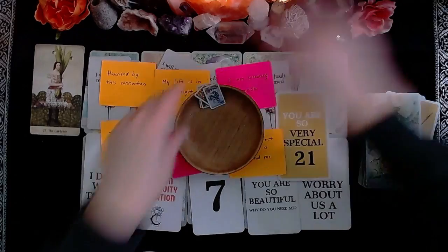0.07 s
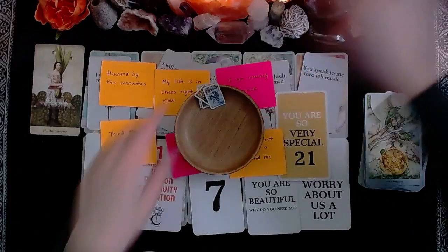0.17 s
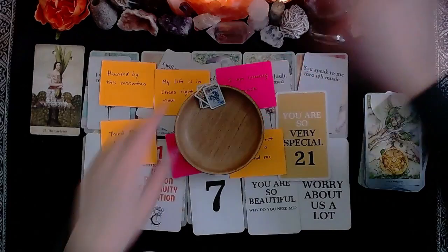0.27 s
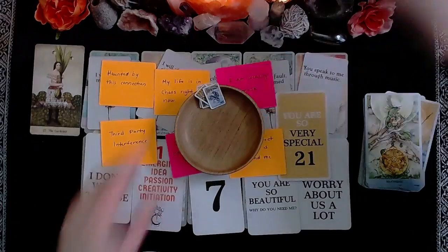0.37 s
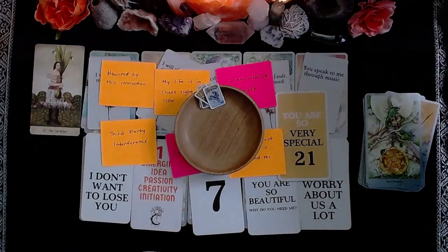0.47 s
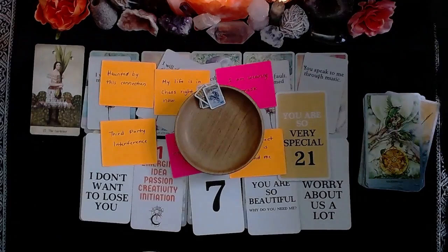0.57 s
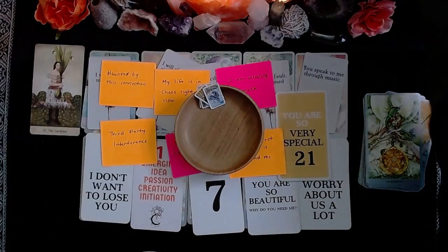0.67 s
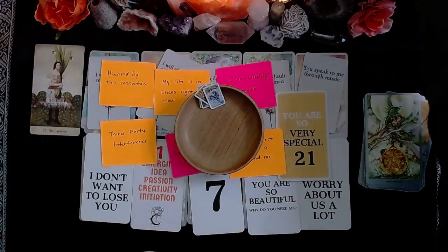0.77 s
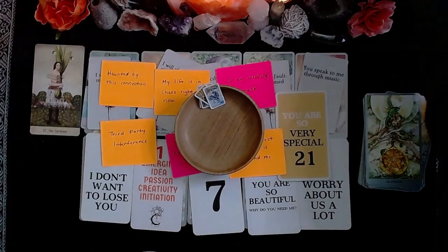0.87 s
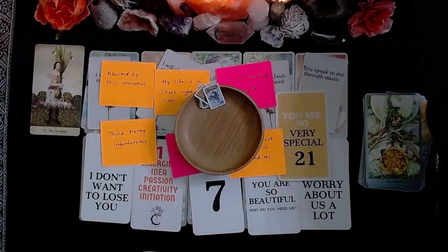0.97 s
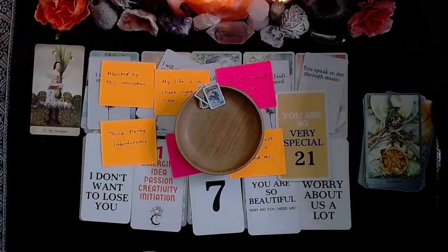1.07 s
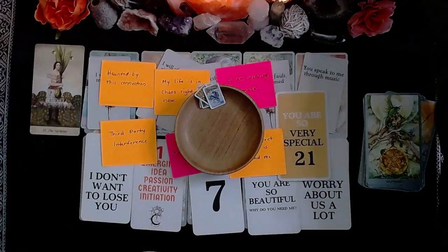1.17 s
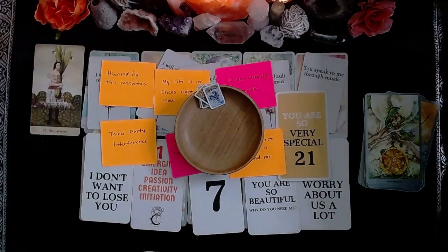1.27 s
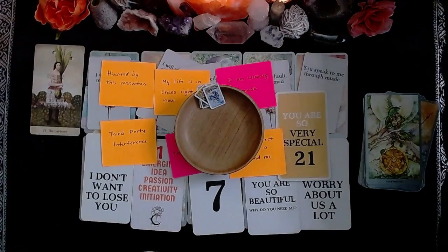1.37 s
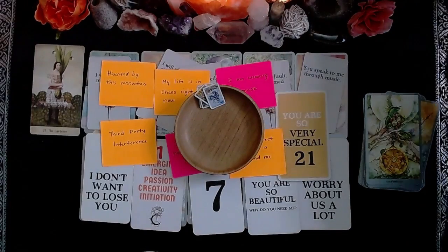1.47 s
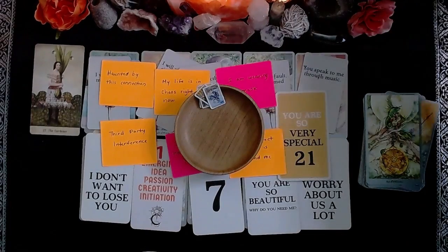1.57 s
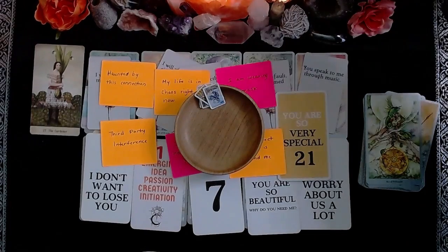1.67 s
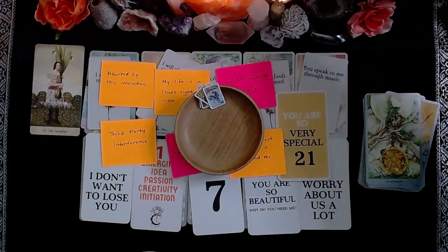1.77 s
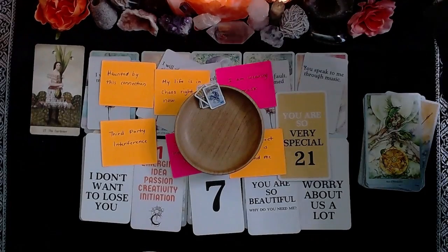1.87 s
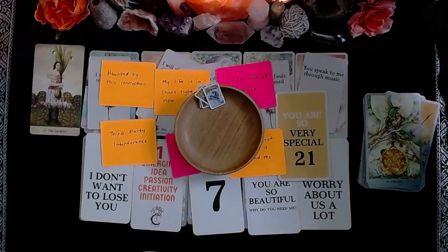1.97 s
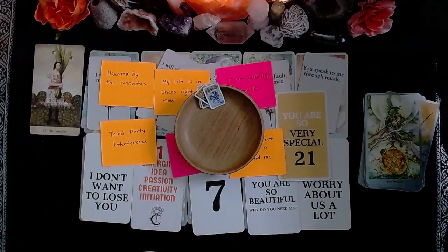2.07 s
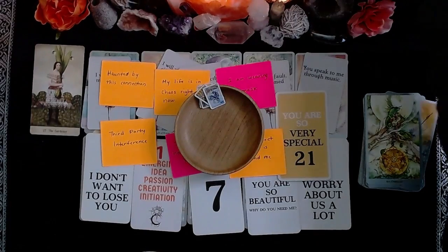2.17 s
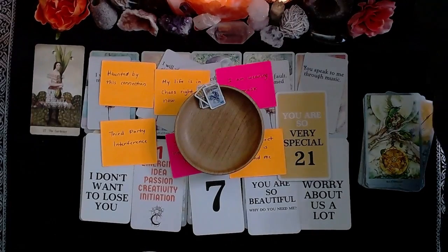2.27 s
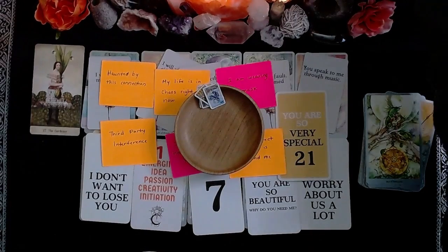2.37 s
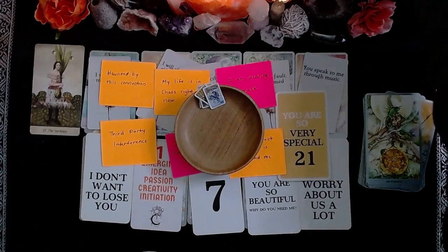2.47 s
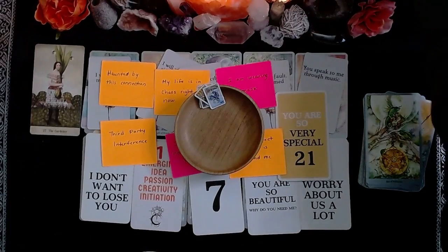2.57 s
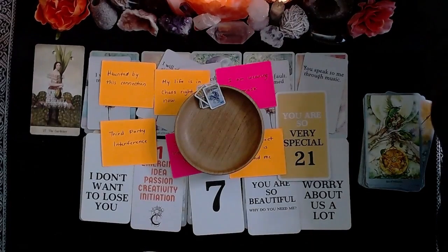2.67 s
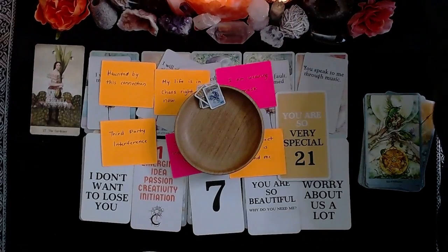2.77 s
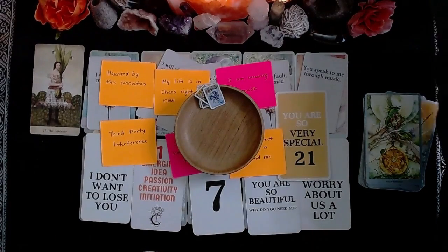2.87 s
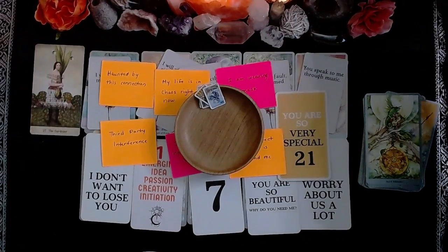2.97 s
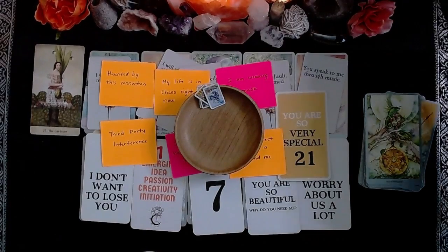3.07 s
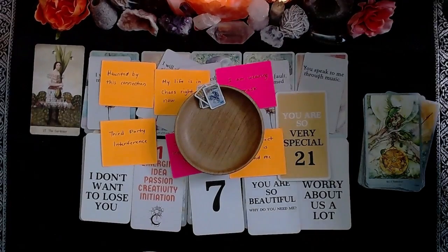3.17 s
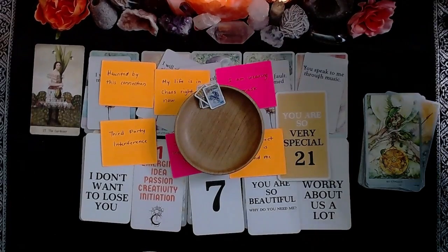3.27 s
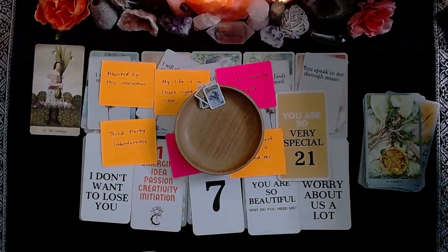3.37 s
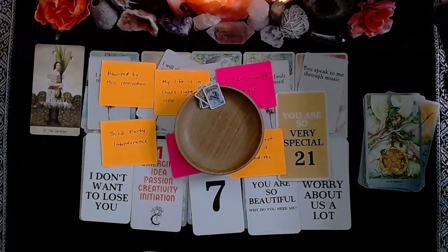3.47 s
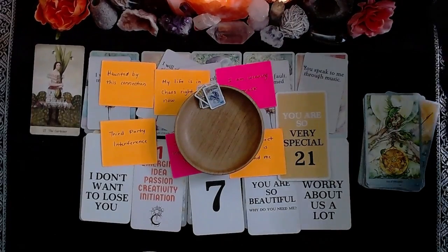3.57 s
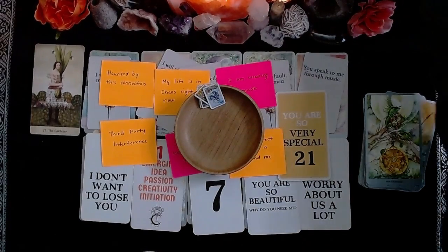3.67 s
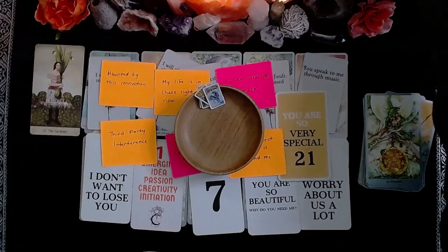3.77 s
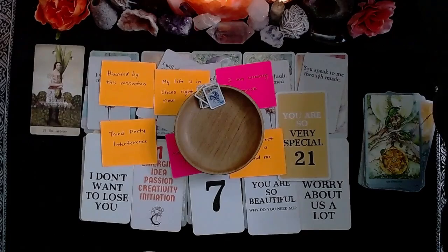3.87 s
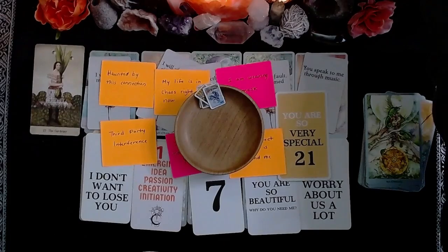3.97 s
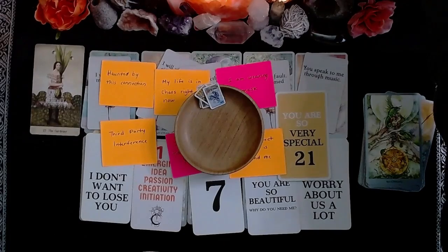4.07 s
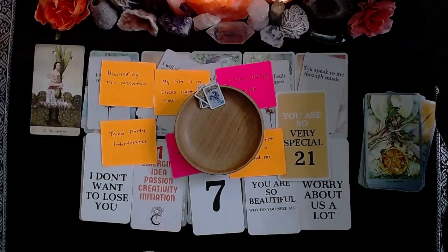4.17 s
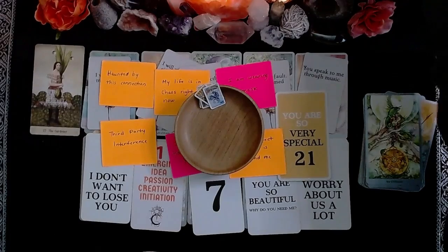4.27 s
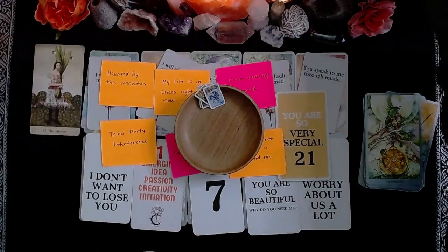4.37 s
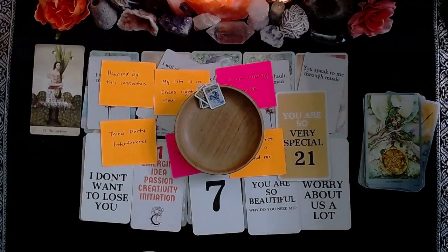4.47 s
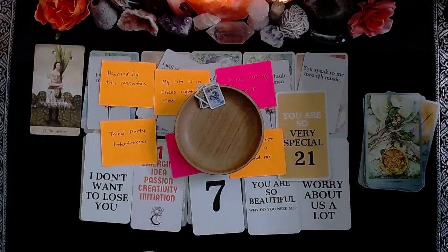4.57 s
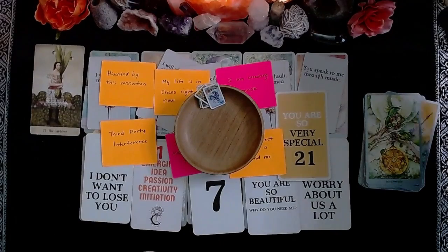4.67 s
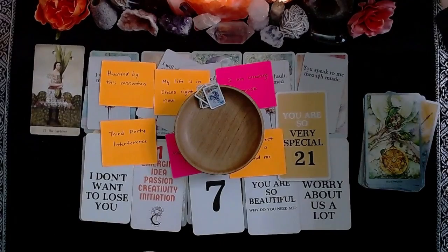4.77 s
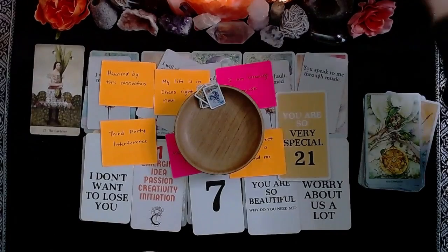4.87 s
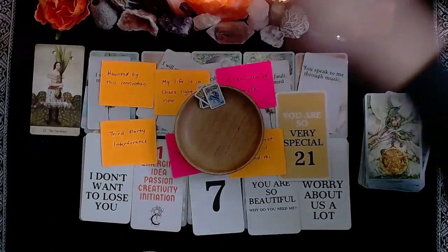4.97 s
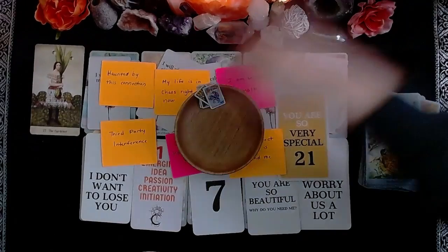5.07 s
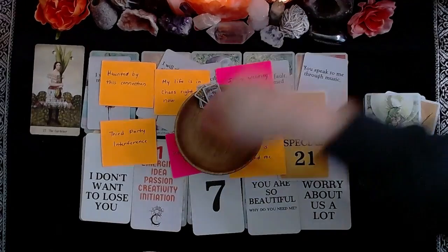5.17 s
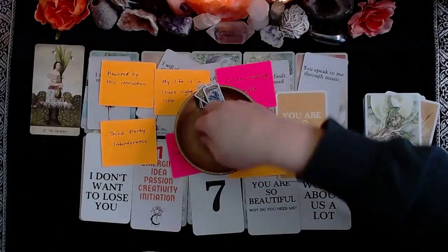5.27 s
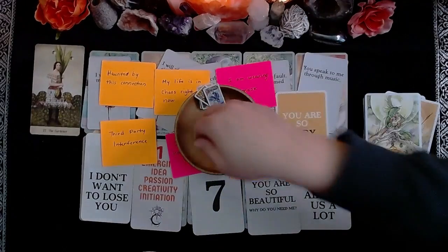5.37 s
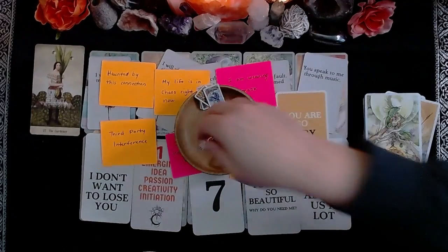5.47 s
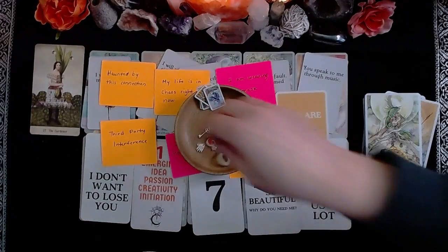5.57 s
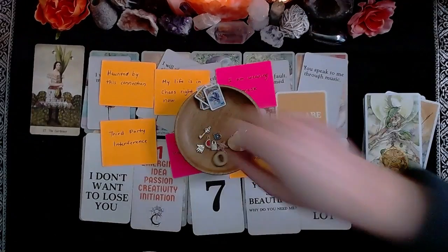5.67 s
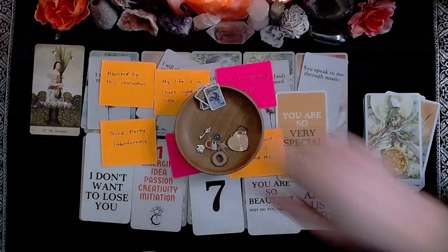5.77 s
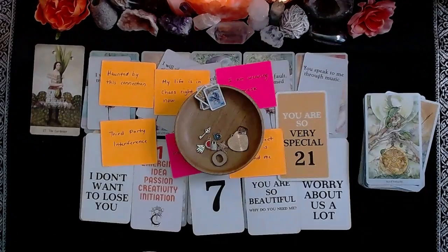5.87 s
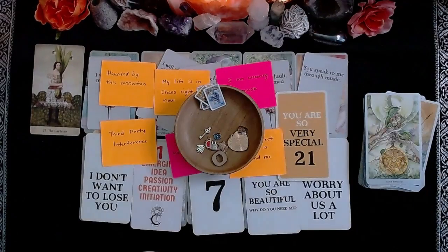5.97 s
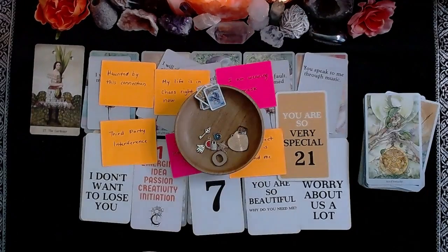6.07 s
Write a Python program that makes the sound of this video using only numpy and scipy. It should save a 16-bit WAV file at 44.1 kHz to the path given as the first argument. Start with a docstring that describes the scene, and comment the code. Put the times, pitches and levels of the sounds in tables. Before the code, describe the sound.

In a quiet room with low hiss and faint hum, a hand rummages through a box of small metal charms for over four seconds, making dense bright clatter, sharp clinks and dull table bumps. After a brief lull with light ticks in the closed hand, the charms drop into a wooden bowl with woody knocks and chinks that quickly settle. Close stereo microphone, short room reflections, slightly dulled top treble.

```python
"""A quiet room with hiss and mains hum runs throughout; soon a hand stirs a boxful of small metal charms.
Dense random collisions ring the charms and the box and shake the table, with single clinks and brief swells of ringing.
Then the charms tick in the closed hand on the way over: brief rattles and notes over a faint rustle.
At last they drop into a wooden bowl in front: knocks, rim rings and chinks thin out as small slides settle.
"""
import sys
import numpy as np
from scipy import signal
from scipy.fft import rfft, irfft, next_fast_len
from scipy.io import wavfile

SR = 44100
rng = np.random.default_rng(int(sys.argv[2]) if len(sys.argv) > 2 else 0)


def transcribe(u):
    """Save the signal u as a 16-bit wav file named by the first command-line argument.

    u: samples, shape (n,) or (channels, n), limited to [-1, 1]; the rate is SR.
    q: integer samples, one column per channel.
    """
    v = np.clip(np.atleast_2d(u).T, -1, 1)
    q = np.round(v * 32767).astype(np.int16)
    wavfile.write(sys.argv[1], SR, q)


N = 270244


def amp(db):
    """Decibels to linear gain."""
    return 10 ** (np.asarray(db) / 20)


def unit(x):
    """x scaled to an rms of one."""
    return x / np.sqrt(np.mean(x ** 2) + 1e-20)


def along(points, hz):
    """Read (pitch_hz, value) points at any frequency, on a log axis."""
    point_hz, value = np.transpose(points)
    return np.interp(np.log(hz + 1), np.log(point_hz + 1), value)


def curves(rows):
    """One level per sample for each column after the time, silent outside the rows."""
    s, *columns = np.transpose(rows)
    t = np.arange(N) / SR
    return [np.interp(t, s, column, left=-120, right=-120) for column in columns]


def fading(s, db, t60):
    """A gain that rises over 8 ms at s and dies away by 60 dB in t60 seconds."""
    t = np.arange(N) / SR - s
    return np.clip(t / .008, 0, 1) * amp(db - 60 * np.maximum(t, 0) / t60)


def wobble(rate):
    """A slow random curve with the given number of knots a second."""
    knots = rng.standard_normal(int(N * rate / SR) + 2)
    return np.interp(np.arange(N) * rate / SR, np.arange(len(knots)), knots)


def filtered(x, response):
    """x times a complex response of frequency."""
    m = next_fast_len(N + SR // 2)
    spectrum = rfft(x, m) * response(np.fft.rfftfreq(m, 1 / SR))
    return irfft(spectrum, m)[..., :N]


def ring(x, modes, shift_db=0):
    """x through a body's resonances; shift_db lets each one be driven harder or softer for a while."""
    out = np.zeros(len(x))
    for k, (hz, width, db) in enumerate(modes):
        drive = x * amp(shift_db * wobble(14)) if shift_db else x
        resonance = signal.lfilter(*signal.iirpeak(hz, hz / width, SR), drive)
        out += (-1) ** k * amp(db) * resonance
    return out


def collisions(per_s, spread_db, clump_db):
    """Random impacts: many small, few large, coming in clumps and short bursts."""
    chance, size, sign = rng.random((3, N))
    force = amp(-abs(spread_db) * np.log(size + .02)) * np.sign(sign - .5)
    train = (chance < per_s / SR) * force
    return unit(train * amp(clump_db * wobble(45) + 2.38 * wobble(160)))


def blows(times, db, modes, t60, rise_s=1e-5):
    """Single impacts: each a short rattle of contacts through the body, db the peak of its ring."""
    t = np.arange(SR // 20) / SR
    force = np.zeros(N + SR)
    envelope = amp(-60 * t / t60) * (1 - np.exp(-(t + 1 / SR) / rise_s))
    rattles = envelope * rng.standard_normal((len(times), len(t)))
    for s, level, rattle in zip(times, db, rattles):
        peak = np.abs(ring(rattle, modes)).max()
        force[round(s * SR):][:len(t)] += amp(level) * rattle / peak
    return ring(force[:N], modes)


def notes(times, db, hz, t60):
    """A struck charm rings briefly on its own note: a decaying sine with a soft onset."""
    t = np.arange(SR // 6) / SR
    out = np.zeros(N + SR)
    onset = 1 - np.exp(-t / 0.0003)
    for s, level, pitch in zip(times, db, hz):
        out[round(s * SR):][:len(t)] += amp(level - 60 * t / t60) * np.sin(2 * np.pi * pitch * t) * onset
    return out[:N]


# colour of the hiss, relative: pitch_hz, level_db
HISS_COLOUR = [(15, -19.5), (30, -3), (65, -6.5), (90, -25.5), (125, -5), (160, -19.5), (280, -21),
               (500, -25.5), (1480, -29.5), (3000, -41), (6770, -46), (8870, -44)]
# mains hum, rms level before it wavers: pitch_hz, level_db
HUM_TONES = [(60, -63), (120, -49.5), (181, -65), (242, -63.5), (298, -67)]
HISS_DB = -50


def room_tone():
    """Air and electronics hiss, mostly alike at both ports, with slightly unsteady hum."""
    mid, side = filtered(rng.standard_normal((2, N)), lambda hz: amp(along(HISS_COLOUR, hz)))
    hiss = amp(HISS_DB) * unit(np.array([mid + 0.43 * side, mid - 0.48 * side]))
    t = np.arange(N) / SR
    hum = np.zeros(N)
    for hz, db in HUM_TONES:
        level = np.sqrt(2) * amp(db + 3.1 * wobble(9))
        hum += level * np.sin(2 * np.pi * hz * t + 0.3 * wobble(8))
    return hiss + hum


# the room's answer: pitch_hz, t60_s, level_db
WALL_ANSWER = [(30, .2, -11), (70, 0.17, -3.5), (200, .2, -13), (495, 0.35, -12), (1000, .15, -5.5),
               (1990, 0.091, -1.5), (5130, .08, -2), (5970, .07, -5), (8500, 0.044, -4.5)]


def walls(x):
    """Each frequency dies at its own speed; the pieces move, so overlapping slices take new paths to each port."""
    hop = SR // 8  # slices last two hops, a quarter second
    blocks = N // hop + 2
    hz, t, noise = signal.stft(rng.standard_normal((blocks, 2, SR // 4)), SR, nperseg=256)
    at_hz, t60, db = np.transpose(WALL_ANSWER)
    t60, db = (np.interp(np.log(hz + 1), np.log(at_hz), c)[:, None] for c in (t60, db))
    decay = amp(-60 * t / t60)
    decay /= np.linalg.norm(decay, axis=1, keepdims=True)
    tails = signal.istft(noise * amp(db) * decay, SR, nperseg=256)[1] / np.sqrt(128)
    x = np.pad(x, (hop + 120, 3 * hop))  # 120 samples of delay before the answer
    out = np.zeros((2, N + 2 * SR))
    fade = np.sin(np.pi * np.arange(2 * hop) / (2 * hop))
    for k, tail in enumerate(tails):
        piece = x[k * hop:][:2 * hop] * fade
        wet = signal.fftconvolve(piece[None], tail, axes=1)
        out[:, k * hop:][:, :wet.shape[1]] += wet
    return out[:, hop:][:, :N]


# the box bumps the table: start_s, level_db, t60_s
TABLE_BUMPS = [(.575, -36, .3), (1.5, -40, .2), (1.79, -32, .4), (3.25, -33.5, .3), (3.88, -39, .15)]
# table resonances: pitch_hz, width_hz, level_db
TABLE_MODES = [(45, 17, -2), (66, 11, 2.5), (129, 33, -2.5), (203, 47.6, -2), (235.4, 39.6, 0),
               (293.3, 23, -2.5), (359.4, 44.6, -4.5)]


def table_bumps():
    """Dying noise through the two lowest table resonances."""
    shake = unit(ring(rng.standard_normal(N), TABLE_MODES[:2]))
    return sum(fading(*bump) for bump in TABLE_BUMPS) * shake


# charms landing in the bowl: start_s, knock_peak_db, chink_db (re knock)
LANDINGS = [(5.1879, -9.5, -17), (5.1972, -13.5, -28), (5.208, -20, -20), (5.2361, -20, -11),
            (5.2418, -29.5, -14.5), (5.255, -17.5, -5), (5.2641, -26, 3.5), (5.2724, -22.5, 0.5),
            (5.2788, -16.5, -3), (5.2826, -21.5, 4.5), (5.2985, -19.5, 5.5), (5.3057, -18.5, 8.5),
            (5.3137, -26.5, 3), (5.3383, -26, 17), (5.3527, -21.5, 4), (5.3672, -23.5, 2.5),
            (5.383, -19.5, -4), (5.4068, -24.5, 3), (5.4318, -25.5, -12.5), (5.4427, -13.5, -6),
            (5.4657, -25, -3), (5.4908, -25.5, 3), (5.5143, -31, -1), (5.5264, -38, 14), (5.549, -37.5, 9),
            (5.5663, -42, 7)]
# sliding in the bowl: time_s, level_db
SLIDES = [(5.2, -73), (5.262, -38.5), (5.33, -40), (5.38, -34.5), (5.44, -37), (5.536, -47), (5.588, -56),
          (5.66, -76)]
# wood, its longest-ringing rim, the charms' chink, and the table under the bowl: pitch_hz, width_hz, level_db
BOWL_WOOD = [(600, 400, -14.5), (1092, 280, -4), (1340, 324, 2.5), (1700, 330, 3), (2034, 320, -1),
             (2970, 1600, -13.5)]
BOWL_RIM = [(2412, 50, 0), (2480, 90, -5)]
CHARM_CHINK = [(3964, 67, 1.5), (4500, 400, -9.5), (5140, 130, 0.5), (5420, 160, -1.5), (5930, 250, -5.5),
               (6760, 240, -1), (7740, 420, -1.5)]
TABLE_THUD = [(75, 23, -1), (119.5, 11, 6.5), (200, 130, -17.5)]
RIM_DB, RIM_GAINS_DB_PER_S = -15, 33  # re knock at the first landing; later charms ring the rim more
SLIDE_METAL_DB = 1  # re the wood's share of the slides
THUD_DB, THUD_T60_S = -34.5, 1


def bowl():
    """Each landing knocks the wood, rings the rim and chinks the charm; slides fill the gaps over one table thud."""
    s, knock_db, chink_db = np.transpose(LANDINGS)
    slide_db, = curves(SLIDES)
    rim_db = RIM_DB + RIM_GAINS_DB_PER_S * (s - s[0])
    out = blows(s, knock_db, BOWL_WOOD, 0.0031)
    out += blows(s, knock_db + rim_db, BOWL_RIM, 0.0031)
    out += blows(s, knock_db + chink_db, CHARM_CHINK, .012)
    wood_slide = ring(collisions(500, spread_db=2.5, clump_db=-0.9), BOWL_WOOD + BOWL_RIM)
    metal_slide = ring(collisions(1200, spread_db=1.5, clump_db=3.0), CHARM_CHINK)
    out += amp(slide_db) * unit(wood_slide)
    out += amp(slide_db + SLIDE_METAL_DB) * unit(metal_slide)
    thud = unit(ring(rng.standard_normal(N), TABLE_THUD))
    return out + fading(s[0], THUD_DB, THUD_T60_S) * thud


# charms clicking in the closed hand on the way over: start_s, peak_db
HAND_TICKS = [(4.796, -21.5), (4.8065, -19.5), (4.81, -21), (4.8522, -25), (4.8608, -24), (4.8788, -35),
              (4.9217, -32.5), (4.9854, -32.5), (4.9947, -19), (5.003, -23.5), (5.0095, -24), (5.0437, -23),
              (5.067, -23), (5.0856, -35), (5.1507, -31), (5.164, -31)]
# jolts of the hand: start_s, rustle_db, t60_s
HAND_JOLTS = [(4.803, -34, .15), (4.853, -41.5, .3), (4.994, -41.5, 0.62), (5.149, -46.5, 0.48)]
# a handful of charms, and the box floor: pitch_hz, width_hz, level_db
HANDFUL_MODES = [(1400, 950, -9), (2530, 1300, -3.5), (3630, 1720, 1), (5210, 1100, 2.5), (6000, 830, -1.5),
                 (7720, 730, 0)]
BOX_FLOOR = [(453, 100, -13), (617, 41, 4), (713, 41, 2.5), (837, 62, -4)]
TICK_HZ, TICK_SPREAD = 3720, 0.073  # typical note of a tick and its scatter in log pitch
TICK_NOTE_DB, TICK_BODY_DB = -11, -27  # note and dull body, re the tick's peak


def hand():
    """Dry ticks over a faint rustle of small contacts that dies after each jolt."""
    s, db = np.transpose(HAND_TICKS)
    hz = TICK_HZ * np.exp(TICK_SPREAD * rng.standard_normal(len(s)))
    contacts = collisions(1200, spread_db=2.0, clump_db=-1.5)
    out = sum(fading(*jolt) for jolt in HAND_JOLTS) * unit(ring(contacts, HANDFUL_MODES))
    out += blows(s, db, HANDFUL_MODES, 0.01)
    out += notes(s, db + TICK_NOTE_DB, hz, 0.019)
    return out + blows(s, db + TICK_BODY_DB, BOX_FLOOR, .02)


# brief swells of narrow ringing in the clatter: start_s, end_s, pitch_hz, level_db
RING_SWELLS = [(1.326, 1.351, 3740, -27), (1.446, 1.596, 5745, -30), (1.478, 1.627, 1430, -39.5),
               (1.569, 1.606, 6100, -27), (2.282, 2.371, 6140, -28), (2.297, 2.347, 3256, -25.5),
               (2.807, 2.855, 1400, -37), (2.956, 2.992, 1407, -33), (2.76, 2.843, 3850, -23),
               (2.879, 2.908, 3960, -20.5), (2.928, 2.991, 6200, -27), (3.645, 3.737, 2374, -21),
               (3.755, 3.837, 2455, -24.5), (4.564, 4.664, 6160, -37.5), (4.692, 4.727, 5930, -56)]


def ring_swells():
    """Random impacts through one narrow resonance, swelling and fading."""
    out = np.zeros(N)
    impacts = collisions(500, spread_db=2.5, clump_db=1.0)
    lead_in = SR // 10  # the resonance is already ringing when the swell is heard
    for start, end, hz, db in RING_SWELLS:
        span = slice(round(start * SR), round(end * SR))
        note = ring(impacts[span.start - lead_in:span.stop], [(hz, 70, 0)])[lead_in:]
        out[span] += amp(db) * unit(note) * signal.windows.tukey(len(note), .4)
    return out


# single louder clinks in the box: start_s, level_db, note_hz, note_db (re level)
BOX_CLINKS = [(0.3014, -20.5, 2350, 0.5), (0.4155, -21, 2880, -3), (0.583, -11, 3900, -11.5),
              (0.6323, -19.5, 2910, -8.5), (0.7048, -8, 2285, -7.5), (0.7537, -9.5, 2360, -4),
              (0.8079, -16.5, 2840, -6.5), (0.8848, -13.5, 6200, -17.5), (1.0712, -10, 3256, -10),
              (1.1107, -16.5, 4680, -4), (1.152, -14.5, 3820, -15), (1.231, 0, 4920, -13),
              (1.2773, -5, 3740, -12), (1.327, -15.5, 3810, -0.5), (1.444, -23, 6400, -10),
              (1.6094, -10.5, 4640, -14), (1.653, -7.5, 3920, -7.5), (1.766, -11.5, 3530, -2.5),
              (1.8099, -13, 5970, -7.5), (1.9065, -7.5, 3210, -7.5), (2.2661, -6.5, 3230, -8.5),
              (2.3823, -16.5, 3220, -0.5), (2.6647, -16, 3880, -3.5), (2.7036, -14.5, 3830, 1),
              (2.7224, -15, 3270, -1.5), (2.7567, -11.5, 3860, -7.5), (2.8694, -17.5, 3820, -8.5),
              (3.0295, -5, 3300, -8), (3.1461, -17.5, 3680, -10.5), (3.22, -15.5, 3870, -9),
              (3.2343, -8, 6140, -15), (3.4254, -9, 6440, -16.5), (3.649, -7.5, 2414, -5.5),
              (3.9473, -11.5, 3570, -16), (4.0661, -16.5, 3690, 0), (4.098, -4.5, 6090, -13.5),
              (4.2414, -16, 3760, -4.5), (4.2602, -14.5, 6100, -5.5), (4.3849, -9.5, 3670, 1.5),
              (4.4522, -22, 3700, 0), (4.4702, -17.5, 6350, -18.5), (4.5652, -21, 6000, -12.5),
              (4.5913, -14, 6080, -5.5)]
# charms clattering, heavier charms clanking, bright jingle, and box sides: pitch_hz, width_hz, level_db
CLATTER_MODES = [(2913, 380, -5), (3270, 130, 5), (3462, 276, 2), (3834, 254, 3), (4063, 157, 2.5),
                 (4420, 640, -2), (4827, 310, 3), (5188, 160, 0.5), (5333, 220, -1)]
CLANK_MODES = [(1985, 72, -4.5), (2182, 74, -6), (2370, 100, -3.5), (2472, 82, -1.5), (2642, 190, -5.5)]
JINGLE_MODES = [(5670, 210, -4.5), (5937, 130, -1), (6187, 90, 1), (6540, 150, -2.5), (6820, 290, -3),
                (7300, 400, -0.5), (7580, 335, -0.5), (8160, 600, -8.5)]
BOX_SIDES = [(1092, 110, -3.5), (1288, 125, -1.5), (1413, 89, -1.5), (1670, 240, -14)]
CLINK_BODY_DB, CRACK_DB = -2.5, -4  # ring of the heap and crack of first contact, re clink level
CLINK_JINGLE_DB, CLINK_BOX_DB = -13, -19.5  # typical, re clink level
CLINK_SCATTER_DB = 3  # how much jingle and box vary from clink to clink
CLINK_RISE_S = .002  # contacts in the heap build up over this time


def clinks():
    """A hard hit rings the heap, cracks, jingles, shakes the box and sounds the struck charm's note."""
    s, db, hz, note_db = np.transpose(BOX_CLINKS)
    jingle_shift, box_shift = CLINK_SCATTER_DB * rng.standard_normal((2, len(s)))
    out = blows(s, db + CLINK_BODY_DB, CLANK_MODES + CLATTER_MODES, 0.016, CLINK_RISE_S)
    out += blows(s, db + CRACK_DB, HANDFUL_MODES, 0.012, CLINK_RISE_S)
    out += blows(s, db + jingle_shift + CLINK_JINGLE_DB, JINGLE_MODES, 0.04)
    out += blows(s, db + box_shift + CLINK_BOX_DB, BOX_FLOOR + BOX_SIDES, 0.023)
    return out + notes(s, db + note_db, hz, .03)


# strokes of the stirring hand, deeper digs clank more: time_s, clatter_db, clank_db and jingle_db (re clatter)
STROKES = [(.12, -70, -3, -8), (.21, -65, -6, -8), (.31, -33.5, -4, 1.5), (.4, -36, -3.5, -2),
           (.52, -44, -7.5, -4), (.6, -34.5, -5.5, 0), (.7, -25.5, -1.5, -0.5), (.85, -30.5, -2, -2),
           (.96, -29.5, -4.5, 0), (1.06, -34, -8, -6), (1.21, -25, -8.5, -4), (1.35, -27.5, -12, -3.5),
           (1.42, -35.5, -5.5, 1), (1.48, -27.5, -9, 2.5), (1.58, -37.5, -7, 7), (1.7, -31, -14, -3.5),
           (1.81, -26, -5.5, 0), (1.9, -23, -4, -0.5), (1.97, -26, -5, -4), (2.08, -24.5, -4, 1),
           (2.18, -32.5, -7, -3), (2.33, -23.5, -2, -2), (2.53, -24, -6, -2.5), (2.68, -32.5, -8.5, -3.5),
           (2.81, -22, -16, -3.5), (2.97, -27.5, -10, 2), (3.03, -30, -7, -1), (3.12, -41.5, -13, -9),
           (3.18, -31.5, -9, -0.5), (3.27, -24.5, -4, 0.5), (3.46, -29, -0.5, 2.5), (3.61, -38.5, -3, 0.5),
           (3.7, -19.5, -6.5, -1.5), (3.75, -24.5, -3.5, -2), (3.79, -20, -6.5, -2.5),
           (3.87, -23.5, -8.5, -1.5), (3.9, -30.5, -10, -5.5), (4.1, -25.5, -10, -0.5),
           (4.19, -30.5, -7, -1), (4.36, -31.5, -7, -0.5), (4.4, -29, -10, 2.5), (4.55, -43.5, -6.5, -1.5),
           (4.6, -37.5, -10.5, 4.5), (4.66, -56, -8, -2), (4.79, -67.5, -10, -2)]
# the table's rumble under the box: time_s, level_db
TABLE_RUMBLE = [(0.12, -66), (0.14, -49.5), (0.54, -44.5), (0.57, -35), (0.69, -31.5), (1.03, -38.5),
                (1.73, -36.5), (1.81, -30), (2.22, -43.5), (2.27, -34), (3.12, -41.5), (3.28, -29.5),
                (3.61, -43), (3.74, -29.5), (4.01, -42.5), (4.44, -37.5), (4.7, -61.5), (4.75, -51.5)]
SHIFT_DB = 1.8  # how far each resonance of the heap swells and sinks
DRY_DB = -3  # dry ticks of metal on metal, re clatter
USUAL_DB, USUAL_DEPTH_DB = -28.5, -7  # clatter and depth of the usual stroke
# box parts: level re clatter at the usual stroke, swing over the clatter's, share of the depth
FLOOR_DB, FLOOR_GROWS, FLOOR_DIGS = -8, 0.85, 0.73
SIDES_DB, SIDES_GROWS, SIDES_DIGS = -11, 0.67, .15


def stirring():
    """One tumbling heap drives charms, box and table, each with impacts of its own; deeper digs shake the box more."""
    clatter_db, depth_db, jingle_db = curves(STROKES)
    rumble_db, = curves(TABLE_RUMBLE)
    heap = collisions(2500, spread_db=2.5, clump_db=2.63)

    def driven(modes, heap_gain, own_gain, shift_db=SHIFT_DB):
        """A body rung by the shared heap and by its own impacts."""
        own = collisions(1500, spread_db=2.5, clump_db=1.5)
        return unit(ring(heap_gain * heap + own_gain * own, modes, shift_db))

    def box_gain(db, grows, digs):
        """Gain of a box part that follows the force and depth of the strokes."""
        force = grows * (clatter_db - USUAL_DB)
        depth = digs * (depth_db - USUAL_DEPTH_DB)
        return amp(USUAL_DB + db + force + depth)

    out = amp(clatter_db) * driven(CLATTER_MODES, 1, 1.36)
    out += amp(clatter_db + depth_db) * driven(CLANK_MODES, 1, 0.83)
    out += amp(clatter_db + jingle_db) * driven(JINGLE_MODES, 1, .8)
    dry_ticks = ring(collisions(1100, spread_db=7, clump_db=3.5), HANDFUL_MODES)
    out += amp(clatter_db + DRY_DB) * unit(dry_ticks)
    out += box_gain(FLOOR_DB, FLOOR_GROWS, FLOOR_DIGS) * driven(BOX_FLOOR, 0.8, 1)
    out += box_gain(SIDES_DB, SIDES_GROWS, SIDES_DIGS) * driven(BOX_SIDES, 0.78, 1)
    return out + amp(rumble_db) * driven(TABLE_MODES, 0.31, 1, shift_db=0)


# stereo phase, left against right: widening up to 5.4 kHz, both channels in step above 5.6 kHz: pitch_hz, phase_rad
STEREO_PHASE = [(100, 0), (860, -.3), (1500, -.7), (2240, -1.2), (3000, -1.6), (4130, -2.2), (5400, -2.8),
                (5620, 0), (9000, 0)]


def phase_spread(x):
    """Turns the phase of left and right by opposite halves of the stereo phase."""
    left_right = np.array([[1], [-1]])
    return filtered(x, lambda hz: np.exp(.5j * along(STEREO_PHASE, hz) * left_right))


def scene():
    """Box and hand spread in stereo phase, bowl in the middle, and the room around them."""
    aside = stirring() + clinks() + table_bumps() + ring_swells() + hand()
    drops = bowl()
    direct = phase_spread(aside) + drops
    return direct + walls(aside + amp(2.0) * drops) + room_tone()


# microphone response: pitch_hz, gain_db
MICROPHONE_RESPONSE = [(30, -1), (6500, 3), (7400, -4), (8000, -11.5), (8500, -11), (8800, -17),
                       (8950, -35.5)]
TOP_HZ = 8950  # band limit


def record(dry):
    """The microphone fades in the top treble, rounds off the loudest peaks and keeps nothing above its band limit."""
    heard = filtered(dry, lambda hz: amp(along(MICROPHONE_RESPONSE, hz)))
    rounded = heard / (1 + np.abs(heard / .8) ** 6) ** (1 / 6)
    return filtered(rounded, lambda hz: hz < TOP_HZ)


dry = scene()
out = record(dry)
transcribe(out)
```